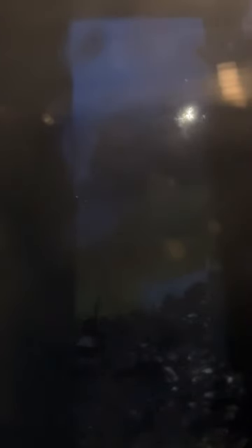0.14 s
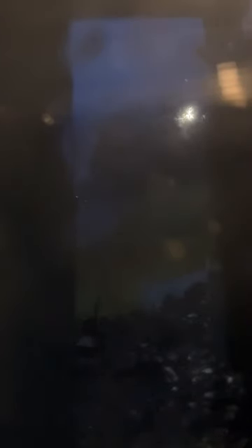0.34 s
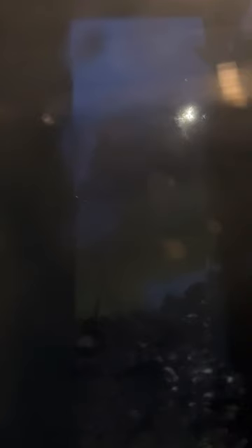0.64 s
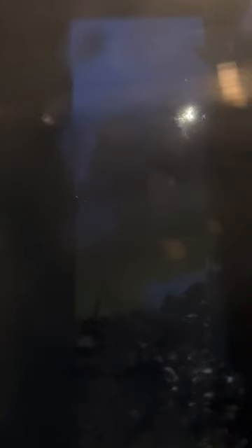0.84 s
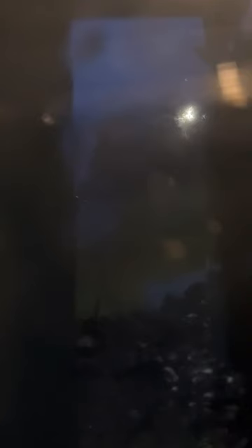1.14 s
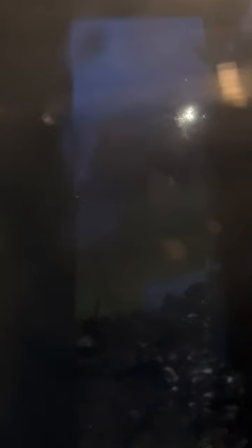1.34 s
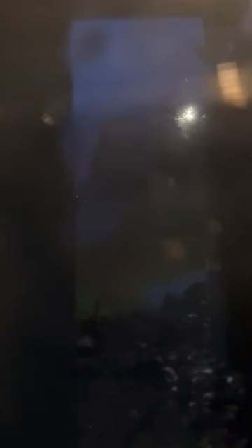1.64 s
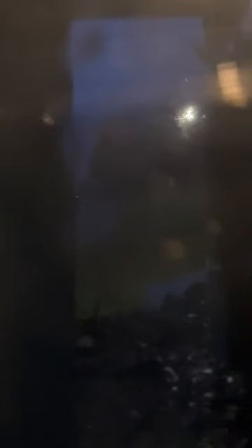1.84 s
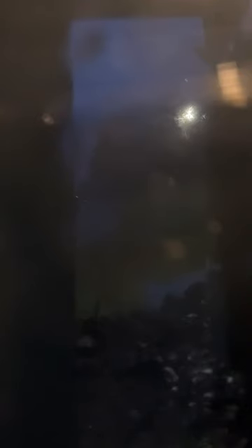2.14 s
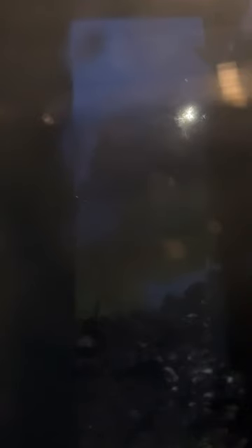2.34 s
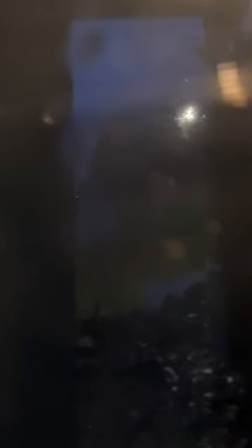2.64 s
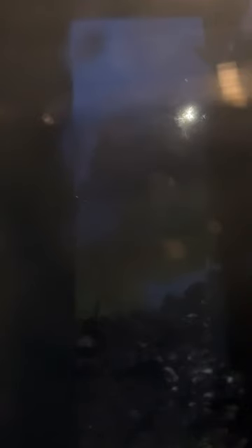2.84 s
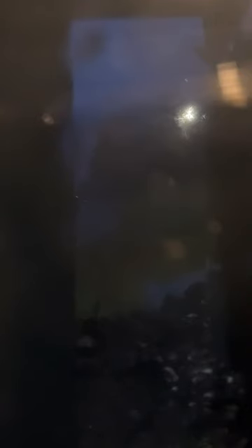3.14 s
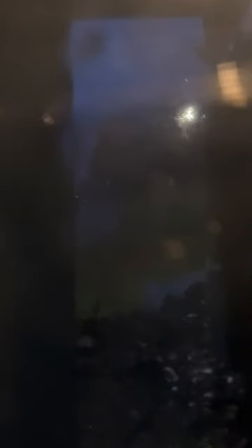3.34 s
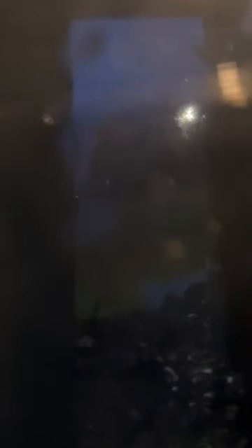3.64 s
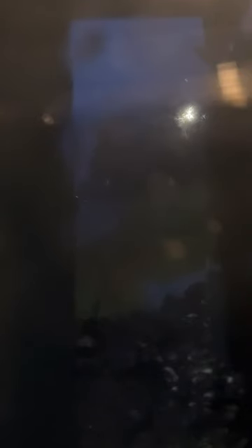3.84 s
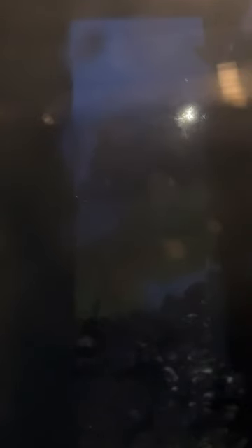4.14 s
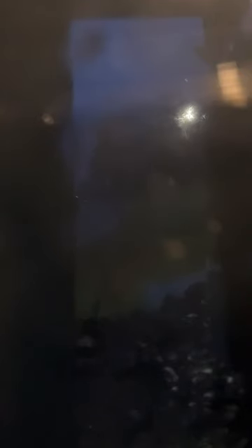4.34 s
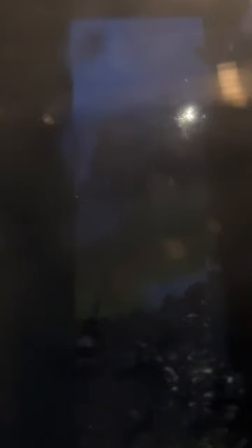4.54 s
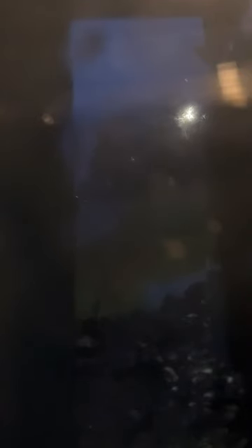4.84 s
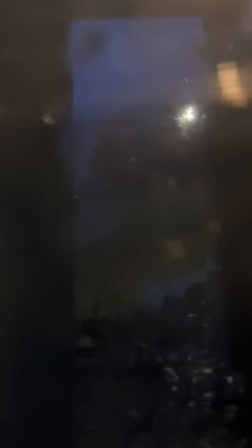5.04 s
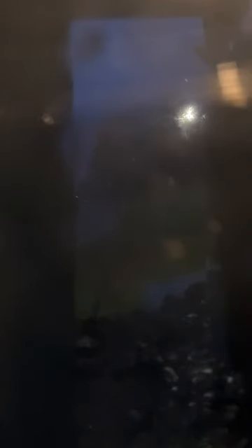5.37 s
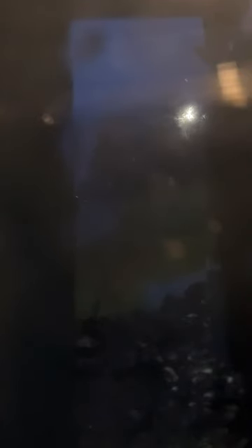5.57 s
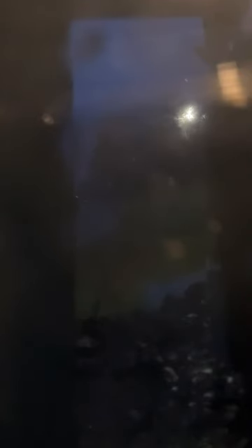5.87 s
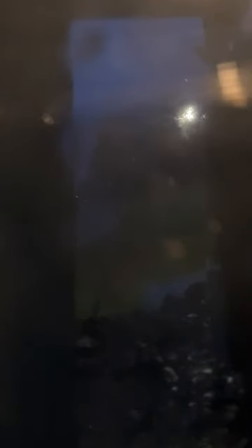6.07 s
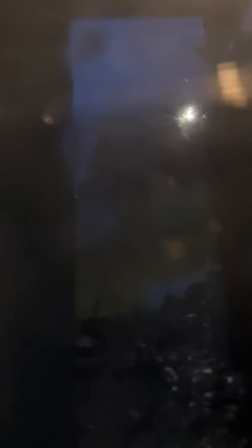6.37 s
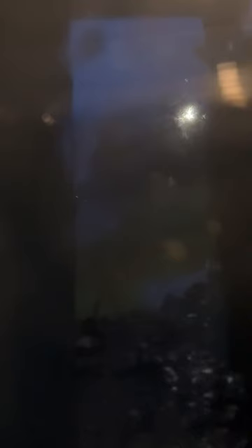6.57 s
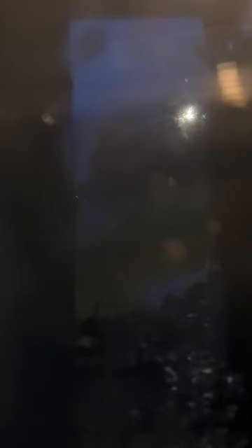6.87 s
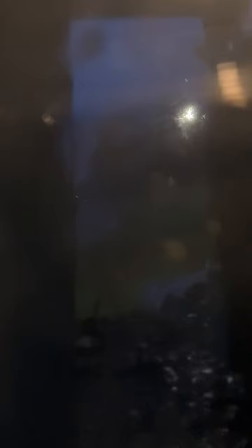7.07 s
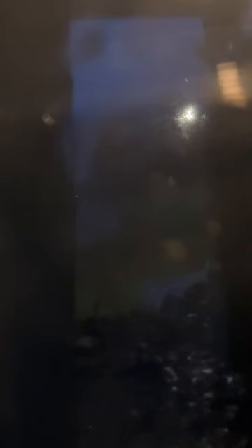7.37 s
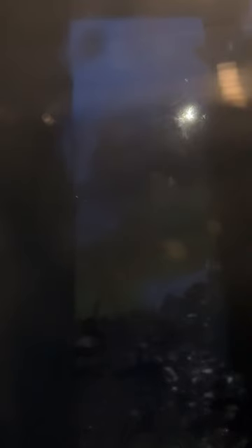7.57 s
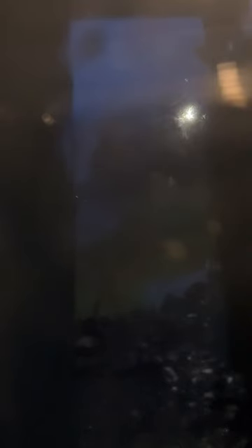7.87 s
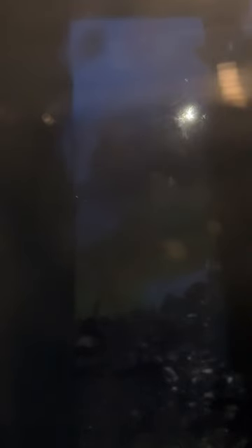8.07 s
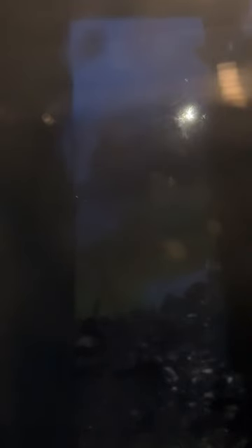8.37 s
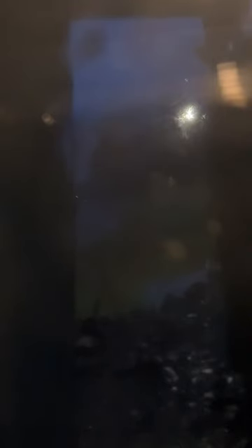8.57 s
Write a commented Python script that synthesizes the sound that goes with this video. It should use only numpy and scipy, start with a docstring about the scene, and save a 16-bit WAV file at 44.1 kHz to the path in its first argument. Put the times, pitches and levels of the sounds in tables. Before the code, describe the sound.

Raindrops hit a closed window, heard close up from indoors. Each bigger drop makes a sharp tick with a short, dull knock, at uneven intervals and strengths. Fine spray patters between them in flurries. Behind the glass, the downpour is a steady, muffled wash over a low rumble, with a few faint splats. The taps come thickest and loudest near the end.

```python
"""Indoors at night, close to a closed window in the rain.
Single drops tap on the pane: each sets its many bending modes ringing, a sharp tick followed by
a short dull knock. Small drops and fine spray patter between them in flurries. The downpour outside
comes through the glass as a steady, muffled wash over a low rumble, with a few nearer splats."""
import sys
import numpy as np
from scipy import signal
from scipy.fft import rfft, irfft, next_fast_len
from scipy.io import wavfile

SR = 44100
rng = np.random.default_rng(int(sys.argv[2]) if len(sys.argv) > 2 else 0)


def unload_audio(sound):
    """Save the sound as a 16-bit wav file, at the path given as the first command line argument."""
    columns = np.transpose(np.atleast_2d(sound))
    # keep every value between -1 and 1, then stretch to whole-number steps
    steps = np.round(np.clip(columns, -1, 1) * 32767)
    wavfile.write(sys.argv[1], SR, steps.astype(np.int16))


N = 384111


def taps(pane):
    """Big drops hit the pane, each a distinct tap."""
    # the big drops: t/s, tick level/dB, knock level/dB, knock tilt/(dB per octave)
    drops = [(0.1297,-40,-44.5,-3), (0.234,-41.5,-55,4), (0.293,-39,-38,-12), (0.713,-40.5,-38.5,6),
             (0.92,-33.5,-38.5,1), (1.1946,-29.5,-28,6), (1.228,-38.5,-44,-2), (1.2976,-40.5,-44.5,-4),
             (1.416,-36.5,-40.5,-10), (1.4341,-43,-39,-3), (1.625,-29.5,-32,1), (1.6675,-37,-40,5),
             (1.917,-33,-35,-2), (2.061,-30.5,-38.5,14), (2.1495,-26.5,-32,5), (2.3404,-22,-25.5,1),
             (2.3644,-31.5,-29,-2), (2.6604,-30.5,-28,-5.5), (2.8678,-36,-39,2), (2.917,-24.5,-38,5),
             (3.134,-27,-28.5,-1.5), (3.481,-41.5,-66,2), (3.6968,-31,-34.5,-2), (3.81,-24,-24.5,1),
             (3.991,-40,-41,4), (4.01,-30,-32,-2), (4.093,-36.5,-37.5,6), (4.2187,-35,-35.5,-2),
             (4.2672,-27.5,-32,-4), (4.2802,-29,-31,-2), (4.4512,-34,-40,-3), (4.487,-38,-36,5),
             (4.5715,-35.5,-57,3), (4.7255,-33,-37.5,-1), (4.7638,-37.5,-40,-3), (4.8002,-33,-38.5,-8),
             (4.823,-33,-45,-6), (4.877,-38.5,-39,2), (4.9804,-32,-35.5,13), (5.0872,-41.5,-43,-11),
             (5.2025,-41.5,-43.5,-5), (5.4355,-30,-27,0.5), (5.4954,-38,-57,2), (5.7605,-28,-31.5,5),
             (5.77,-30,-33.5,1), (5.8922,-29,-34.5,3), (6.007,-34.5,-37.5,12), (6.072,-37.5,-35.5,-4),
             (6.1678,-34.5,-37,2), (6.292,-35.5,-34.5,4), (6.3867,-35,-36.5,-1), (6.4164,-37.5,-38,1),
             (6.4474,-36,-40,14), (6.6279,-31.5,-31,-6), (6.6447,-34,-35.5,10), (6.671,-28.5,-32.5,-1),
             (6.7273,-35.5,-41.5,7), (6.996,-34,-48,-6), (7.009,-34.5,-31,7), (7.0937,-36.5,-40.5,-7),
             (7.2872,-29.5,-34.5,9.5), (7.3286,-41,-48,2), (7.469,-38,-37,6), (7.4921,-18.5,-25,4),
             (7.555,-23,-27.5,-0.5), (7.7,-26.5,-27.5,-5), (7.7179,-29,-30.5,-3), (7.7611,-28,-32,1),
             (7.7737,-23.5,-24.5,-1.5), (7.7883,-29.5,-35,6), (7.853,-37.5,-45,-11), (7.8835,-39.5,-59,4),
             (8.115,-24,-24,-3), (8.2551,-33,-54,1), (8.3373,-32,-37,11), (8.3972,-36,-30,-6),
             (8.4136,-32,-33,-4), (8.4194,-28.5,-31,10), (8.4457,-27,-30.5,-2), (8.5087,-32,-33.5,-2),
             (8.6149,-36,-32,3)]
    return land(pane, *np.transpose(drops))


def patter(pane, max_drops=300, smallest_db=-55, range_db=16, small_bias=1.56, size_follows_rate=0.15):
    """Small drops and spray land at chance moments; a flurry brings more of them, and bigger ones."""
    # flurries of spray: t/s, rate/(drops per s)
    flurries = [(0, 15.8), (0.22, 44.5), (0.5, 3.7), (1.2, 5.93), (1.7, 38), (2.3, 11.1), (3.35, 5.05),
                (4.1, 52.4), (4.85, 34), (5.35, 6), (6.35, 52.6), (7.0, 13), (7.35, 14), (7.65, 53.5),
                (8.71, 24)]
    rate = np.maximum(in_time(flurries), .1)
    drops_due = np.cumsum(rate) / SR
    wait, size = rng.random((max_drops, 2)).T
    turn = np.arange(max_drops) + wait
    falls = turn < drops_due[-1]
    onsets = np.searchsorted(drops_due, turn[falls])
    flurry_scale = (rate[onsets] / rate.max()) ** size_follows_rate
    tick_db = smallest_db + range_db * size[falls] ** small_bias * flurry_scale
    return land(pane, onsets / SR, tick_db, knock_db=tick_db - 0.5, knock_tilt=np.full(len(onsets), 4.5))


def land(pane, times, tick_db, knock_db, knock_tilt, brightening=0.074, tilt_scatter=0.75):
    """Drops land with a tick and a knock; the lighter the knock, the brighter the tick."""
    out = np.zeros(N)
    tick_tilt = -0.1 + brightening * (tick_db - knock_db)   # dB per octave
    tick_tilt += tilt_scatter * rng.standard_normal(len(times))
    ticks, knocks = strike(pane, tick_tilt, knock_tilt)
    for k, s in enumerate(times):
        add(out, s, from_db(tick_db[k]) * ticks[k] + from_db(knock_db[k]) * knocks[k])
    return out


def strike(pane, tick_tilt, knock_tilt, crossover_hz=2000, edge_echo=0.42, edge_lag_s=0.001952):
    """High modes make the tick, low modes the knock; every landing spot weights them anew."""
    hz, strength, ringing = pane
    weights = rng.standard_normal((len(tick_tilt), len(hz))) * strength
    # the wave thrown back by the nearest edge favours some pitches and cancels others
    lag = edge_lag_s * rng.random((len(weights), 1)) * np.sqrt(1e3 / hz)
    weights *= np.abs(1 + edge_echo * np.exp(2j * np.pi * hz * lag))
    parts = []
    for band, tilt in (hz >= crossover_hz, tick_tilt), (hz < crossover_hz, knock_tilt):
        octaves = np.log2(np.maximum(hz[band] / crossover_hz, .35))
        tilted = weights[:, band] * from_db(np.outer(tilt, octaves))
        parts.append(unit_hit(tilted @ ringing[band]))
    return parts


def pane_modes(count=700, dispersion_s=.0011, rise_cycles=0.49, contact_s=0.00025,
               peak_hold=0.15, linger_db=-27, linger_t60_s=0.12):
    """Pitches, strengths and ringing of the glass's dense bending modes."""
    # how strongly the pane radiates: f/Hz, level/dB
    radiation = [(150, -21), (300, -8.5), (500, -9.5), (650, 5.5), (820, 3.5), (980, 0), (1400, -0.5),
                 (1800, -4.5), (2500, -4.5), (3200, -6), (5500, -5), (7500, -2.5), (9600, -10)]
    # resonances that stand out of the dense modes: f/Hz, width/Hz, boost/dB
    resonances = [(782, 29, 8.5), (1414, 110, 7), (1520, 57, 2), (3222, 360, 11), (4290, 400, 5),
                  (4820, 180, 5), (5300, 210, 6), (6060, 200, 5), (5920, 420, 2), (6900, 500, 2),
                  (7700, 80, 6), (9050, 1140, 7)]
    # base ring time of the glass: f/Hz, t60/s
    ring_times = [(300, 0.17), (800, 0.069), (1400, 0.07), (3000, 0.035), (5500, 0.024), (9500, 0.023)]
    hz = 150 + (np.arange(count) + rng.random(count)) * 10000 / count
    peak_db = sum(db / (1 + (2 * (hz - centre) / width) ** 2) for centre, width, db in resonances)
    # the strong resonances ring longer
    t60 = at_hz(ring_times, hz) * from_db(peak_hold * peak_db)
    strength = from_db(at_hz(radiation, hz) + peak_db) / np.sqrt(t60)
    # bending waves are dispersive: the treble arrives first, the lows swell later
    lag = dispersion_s * (np.sqrt(1e3 / hz) - np.sqrt(1e3 / hz[-1]))
    age = np.maximum(np.arange(SR // 10) / SR - lag[:, None], 0)
    swell = 1 - np.exp(-age / (contact_s + rise_cycles / hz[:, None]))
    # wet glass dies fast; a faint part lingers in frame and room
    fade = np.exp(-np.log(1000) * age / t60[:, None])
    linger = from_db(linger_db) * np.exp(-np.log(1000) * age / linger_t60_s)
    phase = 2 * np.pi * (hz[:, None] * age + rng.random((count, 1)))
    return hz, strength, swell * (fade + linger) * np.sin(phase)


def near_splashes(trim_db=0.5):
    """A few nearer drops burst outside and stand out of the wash."""
    # drops on wet ground, ahead of the trim and the glass: t/s, f/Hz, level/dB
    splats = [(1.107, 1230, -39), (1.969, 2597, -40), (3.963, 2472, -39), (5.644, 2120, -38),
              (6.134, 2480, -40), (6.866, 2634, -35.5), (7.173, 2680, -38), (7.426, 2430, -40.5),
              (7.95, 2924, -40.5)]
    out = np.zeros(N)
    for s, hz, level_db in splats:
        add(out, s, from_db(level_db + trim_db) * splat(hz, cycles=27.0))
    return through_glass(out)


def splat(hz, cycles, quality=3.0):
    """A drop bursts on wet ground: a fast-dying puff of noise around one pitch."""
    t = np.arange(SR // 25) / SR
    burst = rng.standard_normal(len(t)) * np.exp(-2 * hz * t / cycles)
    return unit_hit(signal.lfilter(*signal.iirpeak(hz, quality, fs=SR), burst))


def downpour(splash_db=-7.5, rumble_db=-48):
    """Countless drops outside merge into a wash, over a steady low rumble."""
    # colour of the rain through the glass: f/Hz, level/dB
    wash_colour = [(400, -0.5), (460, -4), (620, 1), (850, -0.5), (1400, -1.5), (1800, -3), (2700, -2),
                   (3300, -6.5), (4100, -14), (6000, -16), (8500, -15.5), (9700, -24)]
    # slow drift of the wash: t/s, level/dB
    wash_level = [(0.0, -45.5), (2.76, -44.5), (3.23, -46), (3.88, -44), (8.71, -44)]
    # colour of the rumble from outside: f/Hz, level/dB
    rumble_colour = [(25, -26.5), (38, -31.5), (49, -14.5), (58, -2.5), (74, -10.5), (100, -1), (160, -2.5),
                     (240, -6), (315, -4), (400, -11.5), (600, -14)]
    rain = coloured_noise(wash_colour) + from_db(splash_db) * far_splashes()
    return from_db(in_time(wash_level)) * rain + from_db(rumble_db) * coloured_noise(rumble_colour)


def far_splashes(count=600, low_hz=1000, high_hz=3000, spread_db=4.0):
    """A crowd of distant splats, most of them faint, gives the wash its grain; rms 1."""
    out = np.zeros(N)
    for when, pitch, size in rng.random((count, 3)):
        size_db = spread_db * min(-np.log(1 - size), 3)
        hz = low_hz * (high_hz / low_hz) ** pitch
        add(out, when * N / SR, from_db(size_db) * splat(hz, cycles=10.0))
    return rms_one(through_glass(out))


def through_glass(x, top_hz=3400):
    """The closed window shuts out the treble."""
    return signal.sosfilt(signal.butter(4, top_hz, fs=SR, output="sos"), x + 1e-18)


def coloured_noise(spectrum):
    """A steady noise bed with a given spectrum, rolled off beyond its ends; rms 1."""
    size = next_fast_len(N)
    hz = np.arange(size // 2 + 1) * SR / size + 1
    low_hz, high_hz = spectrum[0][0], 1.2 * spectrum[-1][0]
    roll_off = 1 / np.sqrt((1 + (low_hz / hz) ** 8) * (1 + (hz / high_hz) ** 8))
    white = rfft(rng.standard_normal(size))
    return rms_one(irfft(white * from_db(at_hz(spectrum, hz)) * roll_off, size)[:N])


def from_db(db):
    """Decibels to gain."""
    return 10 ** (np.asarray(db) / 20)


def rms_one(x):
    """Scale to rms 1."""
    return x / np.sqrt(np.mean(x ** 2) + 1e-20)


def unit_hit(x):
    """Give each hit the energy of 10 ms at rms 1."""
    return x / np.sqrt(np.sum(x ** 2, axis=-1, keepdims=True) / (SR / 100))


def in_time(rows):
    """Draw an envelope through breakpoints, sample by sample."""
    return np.interp(np.arange(N) / SR, *np.transpose(rows))


def at_hz(points, hz):
    """Read a table on a log-frequency axis."""
    known_hz, values = np.transpose(points)
    return np.interp(np.log(np.maximum(hz, 1)), np.log(known_hz), values)


def add(out, s, sound):
    """Mix a short sound in at time s."""
    start = int(np.clip(s * SR, 0, N - 1))
    out[start:start + len(sound)] += sound[:N - start]


def scene():
    """Big and small drops on one pane, with the rain behind it, in mono."""
    pane = pane_modes()
    return (taps(pane) + near_splashes() + downpour() + patter(pane))[None]


def record(dry, cutoff_hz=9680):
    """A steep low-pass takes the air off the mix."""
    return signal.sosfilt(signal.ellip(10, .2, 70, cutoff_hz, fs=SR, output="sos"), dry)


dry = scene()
out = record(dry)
unload_audio(out)
```